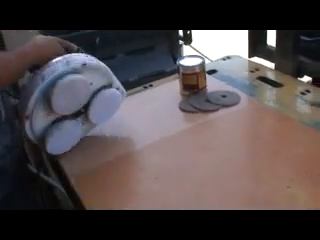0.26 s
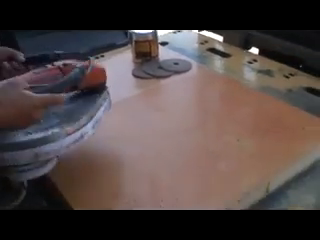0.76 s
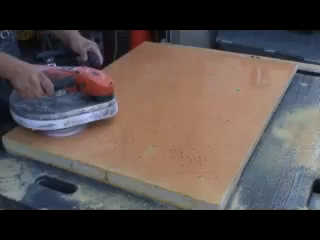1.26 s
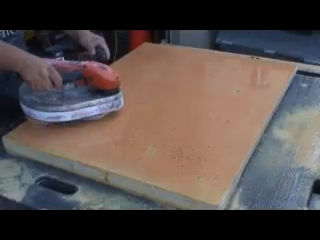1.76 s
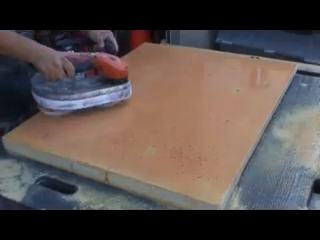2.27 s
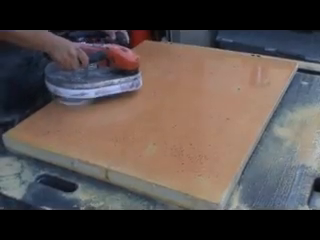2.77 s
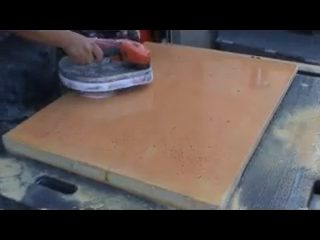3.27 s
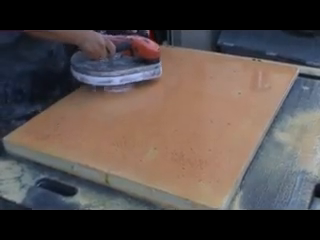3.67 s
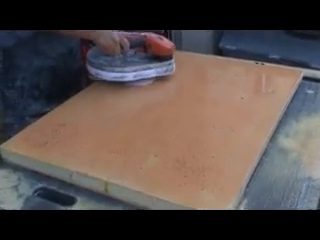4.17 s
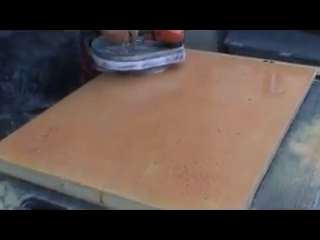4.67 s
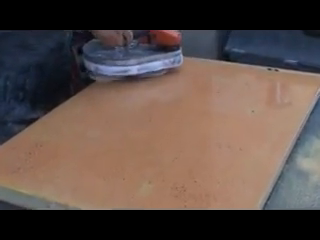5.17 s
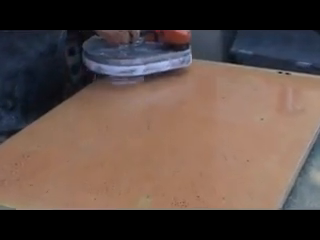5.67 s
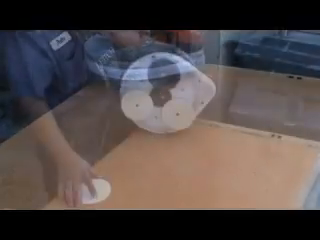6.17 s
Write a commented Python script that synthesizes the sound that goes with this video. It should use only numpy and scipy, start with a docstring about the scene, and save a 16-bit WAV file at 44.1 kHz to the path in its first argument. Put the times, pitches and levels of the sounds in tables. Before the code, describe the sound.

An engine idles quietly nearby while a handheld electric polisher is lifted, its housing giving one clack followed by soft hand scuffs. Suddenly the polisher is running loudly on a concrete slab: the pads rasp with a slight throb, grit hisses and the motor whines under load. Near the end it fades down toward a faint, low workshop rumble. The tool sounds close, in narrow stereo.

```python
"""Polisher on concrete

An engine hums nearby while a three-pad electric polisher is lifted: a knock, then soft scuffs.
Hard cut to the polisher at work on a slab: the pads rasp and throb as they turn, grit hisses,
and the motor and its fan whine, sagging under load. It fades out into a low workshop rumble."""
import sys
import numpy as np
from scipy import signal
from scipy.fft import rfft, irfft, next_fast_len
from scipy.io import wavfile
from scipy.ndimage import uniform_filter1d, map_coordinates

SR = 44100
rng = np.random.default_rng(int(sys.argv[2]) if len(sys.argv) > 2 else 0)


def unload_wav(signal):
    """Save mono or channel-first audio to the path in sys.argv[1] as 16-bit WAV at rate SR, clipped to [-1, 1]."""
    wavfile.write(
        sys.argv[1],
        SR,
        np.round(np.clip(np.atleast_2d(signal).T, -1, 1) * 32767).astype(np.int16),
    )


N = 283122

CUT_S, FADE_START_S, FADE_S = 1.249, 5.742, 0.95
PINION_TEETH, FAN_BLADES = 9, 31

# stereo image of all noise but the engine's (frequency [Hz], left-right likeness [0-1])
IMAGE = [(60, 0.84), (180, 0.66), (540, 0.86), (1610, 0.95), (4840, 0.82), (14500, 0.92)]
# colour of the workshop's rumble (frequency [Hz], relative level [dB])
WORKSHOP_SPECTRUM = [(22, -17), (45, -12), (75, 2.5), (150, 2), (230, -6), (500, -11), (1500, -60)]

# the engine's hum tones (frequency [Hz], relative level [dB])
ENGINE_TONES = [(57, -46), (112, -49), (149, -51), (168, -51), (297, -56), (362, -56.5)]
# colour of its rumble (frequency [Hz], relative level [dB])
ENGINE_SPECTRUM = [(15, -30), (28, -12), (42, -23), (60, -4), (165, -13.5), (205, -15), (330, -19),
                   (385, -14), (430, -19), (540, -20), (750, -25), (1200, -28), (3000, -36), (7000, -44.5),
                   (13000, -54)]
# stereo image of its rumble (frequency [Hz], left-right likeness [0-1])
ENGINE_IMAGE = [(60, 0.88), (370, 0.61), (2330, 0.62), (14500, 0.45)]
# its bass sits to the left (frequency [Hz], left minus right [dB])
ENGINE_PAN = [(40, 9), (120, 4), (300, 4), (1000, -1), (8000, 0)]

# knocks on the housing (time [s], ring level [dB], crack level [dB], treble tilt [dB/octave])
HOUSING_KNOCKS = [(0.5456, -38, -33, 0), (.5522, -31, -50, -11), (.617, -50, -45, 0)]
# the housing's ring (frequency [Hz], relative level [dB], 60 dB decay time [s])
HOUSING_MODES = [(727, -9, 0.054), (1010, -10, 0.064), (1410, -5, .05), (1510, -4.5, 0.07),
                 (1730, -2, .025), (2010, -2, 0.029), (2290, -2, .035), (3870, -16, .04), (4900, -5, .04),
                 (7300, -10, .03)]
# hands on the housing (time [s], half length [s], level [dB], centre [Hz], width [octaves])
HAND_SCUFFS = [(.575, 0.033, -55, 5000, 1.3), (0.616, 0.011, -50, 2900, 0.54),
               (0.64, 0.028, -52.5, 4500, 1), (0.788, 0.032, -52.5, 4800, 0.68),
               (0.916, 0.14, -57.5, 4100, 0.6), (.94, 0.08, -58, 1140, 0.082),
               (1.232, 0.065, -53.5, 2500, 1.05)]

# the motor's speed rises and sags with the load (time [s], fan blade rate [Hz])
FAN_PITCH = [(1.26, 13491), (2.75, 13770), (3.86, 13900), (4.58, 13620), (5.4, 14080), (6.4, 13550)]
# motor and gear tones (shaft multiple [x], level midway [dB], drift [dB/s], phase blur [rad])
GEAR_TONES = [(0.999, -51, 3, 0.26), (4.004, -45.5, 2.5, 0.59), (6.85, -48.5, -2, 0.57),
              (9.62, -60, -0.5, 0.91), (10.15, -52, 1.5, 0.45), (11.98, -52, 1, 0.47),
              (13.88, -52, 0, 0.69), (18.15, -51.5, 0, 0.73), (22.6, -73, 0, .6)]
# the pinion's whine swells for a while (time [s], boost [dB], half length [s])
PINION_SWELLS = [(1.63, 6.5, 0.25), (3.72, 7, 0.068), (5.92, 8, 0.29)]

# resonances of the pads, slab, slab's edge and shroud (frequency [Hz], width [Hz], relative level [dB])
PAD_MODES = [(458.6, 36, -11), (491, 34, -12), (652, 102, -8.5), (761, 88, 1.5), (873, 120, 1),
             (1013, 100, -4), (1124, 148, -1.5), (1295, 82, -7.5), (1527, 170, -6.5), (1760, 225, -10.5),
             (2090, 520, -15.5)]
SLAB_MODES = [(235, 75, -11.5), (321.2, 61, 1.5), (364, 43, -5.5)]
EDGE_MODES = [(542, 100, 0)]
SHROUD_MODES = [(1384, 126, 0)]
# the pads lose their grip for a moment (time [s], dip [dB], half length [s])
PAD_SLIPS = [(1.944, -1, 0.01), (2.007, -2, 0.013), (2.567, -2.5, 0.015), (2.874, -4.5, 0.019),
             (3.054, -4, 0.0085), (3.973, -6, 0.0099), (4.418, -3, 0.011), (5.232, -4, 0.01),
             (5.297, -3.5, .025), (5.943, -2, .014)]
# the shroud's ring flares up (time [s], boost [dB], half length [s])
SHROUD_SWELLS = [(3.85, 5.5, 0.12), (4.73, 7, 0.32)]
# colour of the grit's hiss (frequency [Hz], relative level [dB])
GRIT_SPECTRUM = [(1300, -23.5), (1900, -1), (2500, -5), (3100, -3), (3700, -3.5), (3850, -6), (4500, -9),
                 (4900, -12.5), (6200, -12.5), (6900, -14.5), (8100, -11), (8700, -15.5), (11000, -17),
                 (14400, -29)]
# gritty patches lift the hiss (time [s], boost [dB], half length [s])
GRIT_SWELLS = [(2.36, 1.8, .11), (2.72, 1.6, 0.14), (4.95, 1, 0.43)]


def amp(db):
    """Decibels to gain."""
    return 10 ** (np.asarray(db) / 20)


def unit(x):
    """Scale to rms 1."""
    return x / np.sqrt(np.mean(x ** 2) + 1e-20)


def clock():
    """The time of each sample in seconds."""
    return np.arange(N) / SR


def along(points, hz):
    """Read a curve of (frequency, value) points on a log frequency axis."""
    freqs, values = np.transpose(points)
    return np.interp(np.log(hz + 1), np.log(freqs + 1), values)


def wobble(rate):
    """A smooth random curve with `rate` knots a second."""
    return map_coordinates(rng.standard_normal(int(N * rate / SR) + 4), [clock() * rate])


def swells(rows):
    """Bell-shaped level rides in dB."""
    return sum(db * np.exp(-((clock() - at) / half) ** 2) for at, db, half in rows)


def ramp(db_at_cut, db_per_s):
    """A steady fader move in dB, counted from the cut."""
    return db_at_cut + db_per_s * (clock() - CUT_S)


def pan(left_db):
    """Left and right gains, the left louder by left_db."""
    return amp(np.outer([.5, -.5], left_db))


def filtered(x, response):
    """EQ x with a gain that is a function of frequency."""
    size = next_fast_len(N + SR // 2)
    return irfft(rfft(x, size) * response(np.fft.rfftfreq(size, 1 / SR)), size)[..., :N]


def spectrum(points):
    """An EQ curve through (frequency, dB) points."""
    return lambda hz: amp(along(points, hz))


def band(centre_hz, octaves):
    """A bell-shaped band-pass curve."""
    return lambda hz: np.exp(-.5 * (np.log2((hz + 1) / centre_hz) / octaves) ** 2)


def resonances(modes):
    """An EQ curve of steep-sided resonances whose powers add."""
    def peak(hz, centre, width):
        return (hz * width) ** 2 / (.5 * (centre ** 2 - hz ** 2) ** 2 + (hz * width) ** 2)
    return lambda hz: np.sqrt(sum((amp(db) * peak(hz, centre, width)) ** 2 for centre, width, db in modes))


def grains(per_second):
    """Two trains of tiny impacts of random size."""
    hits = rng.random((2, N)) < per_second / SR
    return unit(hits * rng.standard_normal((2, N)))


def spread(pair, colour, image=IMAGE):
    """Colour two unrelated signals and blend them as mid and side into narrow stereo of rms 1."""
    def response(hz):
        angle = np.arccos(np.clip(along(image, hz), -1, 1)) / 2
        return colour(hz) * np.array([np.cos(angle), np.sin(angle)])
    mid, side = filtered(pair, response)
    return unit(np.array([mid + side, mid - side]))


def rush(colour, image=IMAGE):
    """Coloured stereo noise of rms 1."""
    return spread(rng.standard_normal((2, N)), colour, image)


def workshop(fade):
    """A low bed of rumble creeps up under the polishing and comes forward as fade goes from 0 to 1."""
    gain = np.hypot(amp(ramp(-64.5, db_per_s=1.6)), fade * amp(-42.5))
    return gain * rush(spectrum(WORKSHOP_SPECTRUM))


def engine():
    """An idling engine: unsteady low tones in a slowly growing rumble."""
    t, hum = clock(), 0
    for hz, db in ENGINE_TONES:
        gain = amp(db + 4.5 + 3.2 * wobble(11.76))
        hum += gain * np.sin(2 * np.pi * hz * t + 1.1 * wobble(14.07))
    rumble = amp(-40.5 + 1.5 * t) * rush(spectrum(ENGINE_SPECTRUM), ENGINE_IMAGE)
    return filtered(hum + rumble, lambda hz: pan(along(ENGINE_PAN, hz)))


def handling():
    """The housing clacks and rings as it is lifted, and hands scuff across it."""
    t, out = clock(), np.zeros((2, N))
    for at, ring_db, crack_db, tilt_db in HOUSING_KNOCKS:
        age = np.maximum(t - at, 0)
        for k, (hz, db, t60) in enumerate(HOUSING_MODES):
            softness_db = tilt_db * max(np.log2(hz / 1500), 0)  # a softer contact spares the high modes
            ring = amp(ring_db + db + softness_db - 60 * age / t60)
            out += (-1) ** k * ring * np.sin(2 * np.pi * hz * age)
        crack = amp(crack_db - 60 * age / 0.017) * (t > at)
        out += crack * rush(band(centre_hz=2190, octaves=0.64))
    for at, half, db, centre_hz, octaves in HAND_SCUFFS:
        stroke = amp(db) * np.exp(-.5 * ((t - at) / half) ** 2)
        out += stroke * spread(grains(4000), band(centre_hz, octaves))
    return out * pan(left_db=2.5)


def fan_hz():
    """The rate at which the fan's blades pass, at each sample."""
    return np.interp(clock(), *np.transpose(FAN_PITCH))


def shaft_angle(hunt_hz):
    """The motor's angle in radians; uneven drag makes its speed hunt."""
    shaft_hz = fan_hz() / FAN_BLADES + hunt_hz * wobble(28)
    return 2 * np.pi * np.cumsum(shaft_hz) / SR


def motor(shaft):
    """Gear whine and fan whistle locked to the shaft, fluttering and blurred by play in the drive."""
    def tone(multiple, blur, flutter_db):
        carrier = np.sqrt(2) * np.sin(multiple * shaft + blur * wobble(230))
        return carrier * unit(amp(flutter_db * wobble(22)))
    # gear tones swell or wane as the machine slides across the slab
    from_midway_s = clock() - (CUT_S + N / SR) / 2
    gears = sum(amp(db + drift * from_midway_s) * tone(multiple, blur, flutter_db=4)
                for multiple, db, drift, blur in GEAR_TONES)
    pinion = amp(-47 + swells(PINION_SWELLS)) * tone(PINION_TEETH, blur=.25, flutter_db=2.5)
    # the whistle peaks where the blade rate meets the vents' resonance
    vent_hz, half_width_hz = 13860, 210
    vent_gain = amp(-45.5) / np.hypot(1, (fan_hz() - vent_hz) / half_width_hz)
    whistle = vent_gain * tone(FAN_BLADES, blur=.6, flutter_db=3)
    turbulence = unit(1 + .4 * wobble(500))
    return gears + pinion + whistle * turbulence


def reflections(x, ripple_db):
    """Nearby surfaces favour narrow treble bands, which drift as the machine moves."""
    hz, _, frames = signal.stft(x, SR, nperseg=1024)
    ripple = uniform_filter1d(rng.standard_normal(frames.shape[1:]), size=3, axis=0)  # across frequency
    ripple = uniform_filter1d(ripple, size=30, axis=1)  # across time
    depth_db = ripple_db * np.clip(hz / 2000, 0, 1)[:, None]
    return signal.istft(frames * amp(depth_db * unit(ripple)), nperseg=1024)[1][:, :N]


def grinding(shaft):
    """Diamond grit scrapes the concrete and rings pads, slab and shroud, throbbing as the pads turn."""
    pad_angle = shaft / 27.3 + .2 * wobble(5)  # geared down to about 16 turns a second
    head_angle = shaft / 62  # about 7 turns a second
    throb_db = .55 * np.sin(pad_angle) + .35 * np.sin(head_angle)
    chatter_db = .45 * np.sin(4 * pad_angle) + .5 * np.sin(5 * pad_angle)  # the pad faces catch
    slip_db = swells(PAD_SLIPS)
    hand_db = 0.24 * wobble(12)  # the hands never press quite evenly
    contact_db = throb_db + chatter_db + slip_db + hand_db
    rasp = amp(-22 + contact_db) * spread(grains(20000), resonances(PAD_MODES))
    # sliding in from the edge, the slab's body grows and the edge's ring recedes
    slab = amp(ramp(-43.5, db_per_s=0.9)) * rush(resonances(SLAB_MODES))
    edge = amp(ramp(-32.5, db_per_s=-2.1) + contact_db) * rush(resonances(EDGE_MODES))
    shroud = amp(-31 + swells(SHROUD_SWELLS) + contact_db) * rush(resonances(SHROUD_MODES))
    # grit comes in clumps, so the hiss flutters on top of the throb
    clump_db = 0.38 * wobble(15) + 0.89 * wobble(45) + 0.51 * wobble(240)
    hiss_db = -30.5 + swells(GRIT_SWELLS) + 0.78 * throb_db + 0.52 * slip_db + hand_db + clump_db
    hiss = amp(hiss_db) * spread(grains(26000), spectrum(GRIT_SPECTRUM))
    return reflections(rasp + slab + edge + shroud + hiss, ripple_db=1.9)


def scene():
    """Engine and handling cut hard to the running polisher, which crossfades into the workshop."""
    cut = np.clip((clock() - CUT_S) / 0.00049, 0, 1)
    fade = np.clip((clock() - FADE_START_S) / FADE_S, 0, 1)
    shaft = shaft_angle(hunt_hz=0.923)
    polisher = pan(ramp(1.7, db_per_s=-0.18)) * (grinding(shaft) + motor(shaft))
    working = (1 - fade) * polisher + workshop(fade)
    lifting = engine() + handling()
    return (1 - cut) * lifting + cut * working


def record(dry):
    """Master chain: a soft clip rounds the highest peaks, then a brick-wall low-pass trims the top."""
    ceiling, top_hz = .42, 14450
    rounded = dry / (1 + np.abs(dry / ceiling) ** 12) ** (1 / 12)
    return filtered(rounded, lambda hz: hz < top_hz)


dry = scene()
out = record(dry)
unload_wav(out)
```